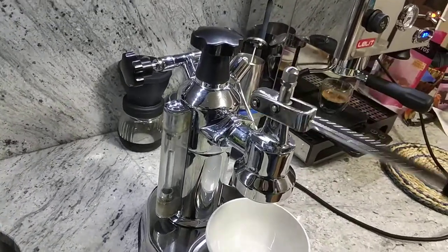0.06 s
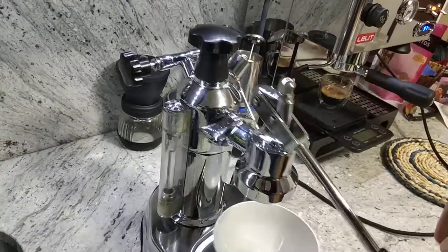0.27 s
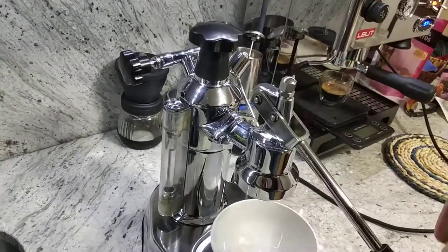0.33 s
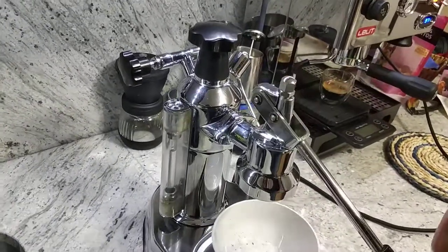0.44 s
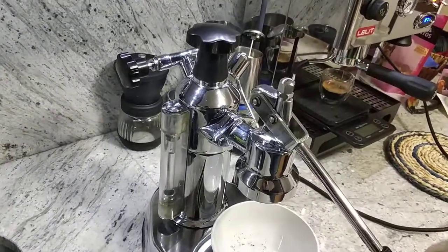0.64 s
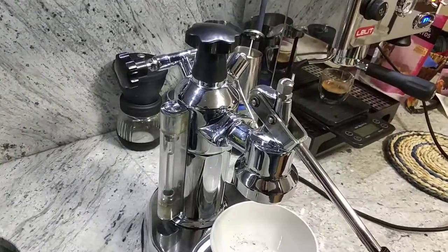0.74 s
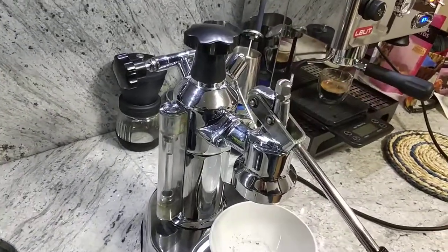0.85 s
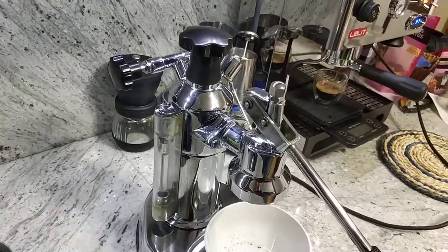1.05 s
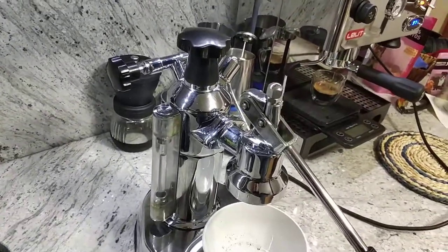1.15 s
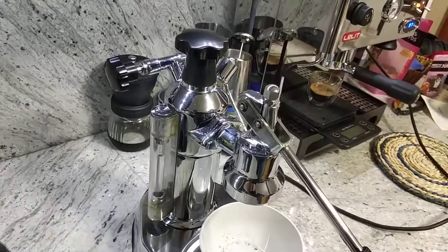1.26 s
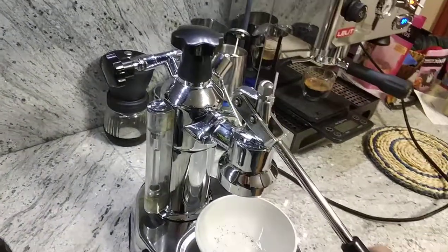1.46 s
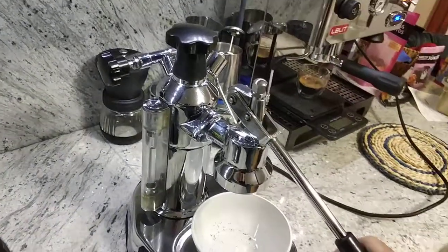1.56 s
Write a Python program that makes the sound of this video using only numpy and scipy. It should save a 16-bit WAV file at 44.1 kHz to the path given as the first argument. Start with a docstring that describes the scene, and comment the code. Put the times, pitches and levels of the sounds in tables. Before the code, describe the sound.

An espresso machine's steel lever clacks down, sharp and bright, at about 0.2 seconds, after a faint hiss of steam. A sputtering spurt follows at once while the machine rattles on the kitchen counter, knocking hardest near 0.4 seconds. Both die away by about 0.7 seconds, leaving a fading metallic ring. A thin hiss continues until around 1.6 seconds.

```python
"""A faint hiss of steam, then the steel lever of an espresso machine clacks down in a kitchen.
The impact excites short, bright modes of the steel. Escaping pressure drives a sputtering spurt
through the spout while the machine rattles on the counter; each knock feeds the modes of its
housing and body. These and one clear partial ring on, and the thin hiss remains."""
import sys
import numpy as np
from scipy import signal
from scipy.fft import rfft, irfft, next_fast_len
from scipy.io import wavfile
from scipy.ndimage import map_coordinates

SR = 44100
rng = np.random.default_rng(int(sys.argv[2]) if len(sys.argv) > 2 else 0)


def bounce(signal):
    """Save signal as a 16-bit WAV file at the path given by the first command-line argument."""
    frames = np.transpose(np.atleast_2d(signal))
    limited = np.clip(frames, -1, 1)
    pcm = np.round(limited * 32767).astype(np.int16)
    wavfile.write(sys.argv[1], SR, pcm)


N = 70560

# Spectra of the room's background and of the steam. Each row: frequency in Hz, relative level in dB.
BACKGROUND_COLOUR = [(30, -49.5), (100, -30), (200, -4), (300, 1.5), (420, -5), (800, -7.5), (1300, -19),
                     (3000, -20), (10000, -37)]
LEAK_COLOUR = [(760, -49), (1300, -14), (1680, -12), (1890, -7), (2370, -8.5), (2600, -6), (3240, -5),
               (3510, -5), (3850, -6), (4290, 1), (5860, -5.5), (7630, -1.5), (9670, -6.5), (10700, -21.5),
               (11500, -49), (15000, -77), (22000, -120)]
FIZZ_COLOUR = [(4000, -31), (6500, -8), (7700, 2), (9400, -1.5), (10700, -17)]
SPIT_COLOUR = [(2000, -35), (5000, -6), (6600, 8), (7800, 0), (10000, 1), (11000, -16.5)]
SPURT_COLOUR = [(1180, -31), (2000, -5.5), (2120, 1.5), (2380, -5), (3290, -2.5), (3570, -8.5), (4410, 1),
                (5740, -1), (7200, -2.5), (7920, -7.5), (8580, -4.5), (10700, -20.5), (11000, -32.5),
                (11300, -75), (11500, -91), (15000, -118), (22000, -120)]  # also colours the ticks of the rattle
SPURT_ROLL_OFF = [(100, -52.5), (400, -11.5), (2000, -1), (3500, -1.5)]
# Spectra of the solid contacts. Each row: frequency in Hz, relative level in dB.
CHATTER_COLOUR = [(35, -68), (60, -56), (141, -12.5), (211, -5), (249, 1.5), (335, -5), (533, -4),
                  (800, -8.5), (999, -1.5), (1140, -8), (1250, 1), (1560, -13), (1740, -5), (2020, -17.5),
                  (2870, -11), (3650, -21), (5000, -19.5), (6500, -43.5), (11000, -120)]
CLANG_COLOUR = [(100, -46), (300, -8), (700, -15.5), (1000, -1), (1400, -1), (1850, -1.5), (2150, -6.5),
                (2850, -8), (3500, -22), (8000, -37.5)]
THUD_COLOUR = [(50, -59.5), (110, -24), (145, -10.5), (215, 4.5), (270, -4.5), (370, -3), (470, -10),
               (1000, -33), (3000, -67.5)]
SCRAPE_COLOUR = [(120, -50.5), (280, -10), (400, 4.5), (850, 0), (1300, -13.5), (2200, -12.5),
                 (6000, -17.5), (10000, -26.5)]
CLACK_COLOUR = [(100, -59), (200, -32.5), (400, -12), (1350, -17), (1700, -24.5), (2300, -16), (3500, -17),
                (4100, -2), (5700, -6), (6200, -4), (8600, -6.5), (10500, -22.5), (11500, -41)]

# Drift of the background. Each row: time in seconds, level in dB.
BACKGROUND_LEVEL = [(0, -65.5), (.9, -66.5), (1.35, -60.5), (1.6, -64.5)]
# Reverberation of the kitchen. Each row: frequency in Hz, T60 in seconds.
KITCHEN_T60 = [(150, 0.71), (500, 0.47), (2000, 0.49), (5000, 0.51), (10000, 0.33)]
# Difference between the channels. Each row: frequency in Hz, gain of the side signal in dB.
SIDE_GAIN = [(3500, -82), (5200, -25.5), (7000, -17.5), (10000, -10), (11000, -11)]

# Course of the leak. Each row: time in seconds, hiss level in dB, high whistle level in dB.
LEAK_LEVELS = [(0, -53, -59), (0.041, -62.5, -73), (.075, -55, -51), (.1, -60.5, -65), (.15, -51.5, -56),
               (0.199, -46, -59), (.45, -62.5, -65.5), (0.779, -62.5, -68.5), (0.889, -63, -63),
               (1.079, -62.5, -73), (1.2, -55, -73), (1.35, -54, -67), (1.5, -57.5, -71), (1.6, -55.5, -72)]
# Resonances of leak and spout. Each row: centre in Hz, bandwidth in Hz, relative level in dB.
LEAK_RESONANCES = [(1956, 180, -12.5), (3480, 210, -17.5), (4200, 240, -11)]
SPOUT_RESONANCES = [(4795, 840, -9), (6375, 300, -8.5), (8880, 300, -11)]

# Modes of the machine's parts. Each row: frequency in Hz, relative level in dB, T60 in seconds.
HOUSING_MODES = [(842, -9, 0.14), (1021, -5, .4), (1101, -2, 0.41), (1412.3, 0, 0.14), (1400, -3, 0.51),
                 (1572, -9, 0.59), (1643, -5, .35), (1756, 3, 0.41), (1841, 5, 0.1), (2500, -12, .3),
                 (2890, -10.5, .27)]
BODY_MODES = [(151, -1.5, 0.22), (177, -5.5, .18), (212.13, 1, .36), (302.3, -9, 0.79), (332, -6, 0.63),
              (375, 0, 0.18)]
SMALL_PART_MODES = [(4398, -3, 0.29), (4510, -5.5, 0.18), (4750, 0, .25), (6240, -1.5, 0.25),
                    (6750, -4.5, 0.218), (8300, 2.5, 0.17)]
LONG_MODES = [(1241, -23, 1.105), (208.5, -36, 1.71)]
LEVER_MODES = [(2366, -19.5, .1), (4095, -4.5, .08), (4420, -4.5, 0.24), (4600, -2.5, 0.22),
               (4890, -2.5, 0.1), (6227, 12.5, 0.036), (6340, -2, .09), (6750, -5.5, 0.073),
               (6750, -19.5, .07), (7330, -4, .07), (8378, 0.5, 0.11), (8150, 3, 0.027)]

# Knocks of the rattle. Each row: start in seconds, then levels of clang, thud and tick in dB.
KNOCKS = [(.236, -23, -48.5, -34), (.252, -22.5, -44.5, -34.5), (0.281, -24, -42.5, -26),
          (0.312, -20.5, -31, -32.5), (0.3145, -14.5, -34, -32), (.345, -18.5, -33, -18.5),
          (.357, -19, -32.5, -24.5), (0.3638, -19, -19, -18.5), (0.38, -20.5, -23.5, -22),
          (.396, -10, -22, -22), (0.411, -27, -23.5, -44), (0.416, -23.5, -27.5, -21),
          (0.425, -20.5, -24.5, -37.5), (0.443, -28.5, -37, -36.5), (.473, -28.5, -43, -47),
          (0.504, -22.5, -35, -34), (0.5209, -24, -33, -48)]
# A late spit of steam, and the lever's contacts. Each row: start in seconds, level in dB.
SPITS = [(.689, -47.5)]
CLACKS = [(0.2303, -14.5), (0.2336, -3.5), (0.2418, -15), (0.2596, -21)]

# Overall passband. Each row: frequency in Hz, gain in dB.
PASSBAND = [(40, -20), (95, -15.5), (140, -3), (10000, -4.5), (10650, -6.5), (11400, -34)]


def amp(db):
    """Decibels to amplitude ratio."""
    return 10 ** (np.asarray(db) / 20)


def unit(x):
    """Normalisation to rms 1."""
    return x / np.sqrt(np.mean(x ** 2) + 1e-20)


def along(points, hz):
    """Interpolation of (Hz, value) points on a logarithmic frequency axis."""
    f, v = np.transpose(points)
    return np.interp(np.log(hz + 1), np.log(f + 1), v)


def curve(rows):
    """Linear interpolation of (seconds, value) points at every sample."""
    return np.interp(np.arange(N) / SR, *np.transpose(rows))


def since(start):
    """Seconds elapsed since start, zero before."""
    return np.maximum(np.arange(N) / SR - start, 0)


def wobble(rate):
    """Smooth random modulation with rate knots a second."""
    return map_coordinates(rng.standard_normal(N // 20), [np.arange(N) * rate / SR], mode="wrap")


def filtered(x, response):
    """Linear filtering: the spectrum of x times a frequency response."""
    size = next_fast_len(N + SR // 2)
    return irfft(rfft(x, size) * response(np.fft.rfftfreq(size, 1 / SR)), size)[..., :N]


def high_pass(x, hz):
    """Fourth-order attenuation of the bass below hz."""
    return signal.sosfilt(signal.butter(4, hz, "highpass", fs=SR, output="sos"), x)


def coloured(x, colour):
    """Spectral shaping by (Hz, dB) points, at rms 1."""
    return unit(filtered(x, lambda hz: amp(along(colour, hz))))


def noise(colour):
    """Coloured Gaussian noise of rms 1."""
    return coloured(rng.standard_normal(N), colour)


def grains(rate, spread_db):
    """A Poisson process: impulses of random sign and strength, on average rate a second."""
    return (rng.random(N) < rate / SR) * rng.choice([-1, 1], N) * amp(spread_db * rng.standard_normal(N))


def blow(start, t60, attack_s):
    """Envelope of a damped response: a rise, then exponential decay."""
    t = since(start)
    return amp(-60 * t / t60) * (1 - np.exp(-t / attack_s))


def swell(start, end, rise_db_per_s, fall_db_per_s):
    """Envelope that grows exponentially until start, holds, and decays after end."""
    t = np.arange(N) / SR
    return amp(-rise_db_per_s * np.maximum(start - t, 0) - fall_db_per_s * since(end))


def whistle(hz, width_hz):
    """Resonance driven by noise: a narrow band that flutters in level."""
    band = filtered(rng.standard_normal(N), lambda f: 1 / (1 + (2 * (f - hz) / width_hz) ** 2))
    return amp(2.3 * wobble(24)) * unit(band)


def ring(start, modes, scatter_db, attack_s):
    """Free vibration: a sum of damped sinusoids of scattered strength and random phase."""
    t, out = since(start), np.zeros(N)
    for hz, db, t60 in modes:
        envelope = amp(db + scatter_db * rng.standard_normal()) * blow(start, t60, attack_s)
        out += envelope * np.sin(2 * np.pi * (hz * t + rng.random()))
    return out


def sustained(starts, levels_db, modes, waver_db=3):
    """Incoherent summation: the energies of many hits add in each mode; level and phase waver."""
    t, out = since(0), np.zeros(N)
    for hz, mode_db, t60 in modes:
        energy = sum((amp(db) * blow(start, t60, 0.002)) ** 2 for start, db in zip(starts, levels_db))
        cycles = hz * t + rng.random() + 0.05 * wobble(40)
        out += amp(mode_db + waver_db * wobble(30)) * np.sqrt(energy) * np.sin(2 * np.pi * cycles)
    return out


def background():
    """Ambient noise: a faint, low rush that drifts in level."""
    return amp(curve(BACKGROUND_LEVEL)) * noise(BACKGROUND_COLOUR)


def kitchen(x):
    """Reverberation: reflections from stone walls form a diffuse tail whose treble dies first."""
    hz, t, spectra = signal.stft(rng.standard_normal(SR), SR, nperseg=256)
    decay = amp(-60 * t / along(KITCHEN_T60, hz)[:, None])
    tail = signal.istft(spectra * decay, SR, nperseg=256)[1]
    response = np.pad(tail / np.linalg.norm(tail), (SR // 250, 0))  # arrives 4 ms late
    return signal.fftconvolve(x, response)[:N]


def leak():
    """Flow noise: steam hisses, whistles and spits once; a bright fizz joins as the leak opens."""
    times, hiss_db, whistle_db = np.transpose(LEAK_LEVELS)
    hiss = noise(LEAK_COLOUR) + sum(amp(db) * whistle(hz, width) for hz, width, db in LEAK_RESONANCES)
    hiss *= amp(curve(np.c_[times, hiss_db]) + 0.6 * wobble(35)) / np.std(hiss)
    high_whistle = amp(curve(np.c_[times, whistle_db])) * whistle(hz=6145, width_hz=170)
    fizz = amp(-60.5) * noise(FIZZ_COLOUR) * swell(1.26, 1.52, rise_db_per_s=61.5, fall_db_per_s=22)
    spit_envelope = sum(amp(db) * blow(start, t60=0.084, attack_s=0.002) for start, db in SPITS)
    return hiss + high_whistle + fizz + noise(SPIT_COLOUR) * spit_envelope


def ringing():
    """Modal decay: the knocks set the machine ringing; two lightly damped partials last longest."""
    starts, clang_db, thud_db, tick_db = np.transpose(KNOCKS)
    partials = ring(0.396, LONG_MODES, scatter_db=0.38, attack_s=0.09)  # from the hardest knock
    housing = amp(-18) * sustained(starts, clang_db, HOUSING_MODES)
    body = amp(-9.5) * sustained(starts, thud_db, BODY_MODES)
    jingle = amp(-22.5) * sustained(starts, tick_db, SMALL_PART_MODES)
    return partials + housing + body + jingle


def chatter():
    """Superposition of small impacts: they fill the gaps between the knocks and die away."""
    contacts = coloured(grains(rate=1500, spread_db=4.5), CHATTER_COLOUR)
    onset = 1 - np.exp(-since(0.22) / 0.025)
    return amp(-28) * contacts * swell(0.36, 0.46, rise_db_per_s=110, fall_db_per_s=103.5) * onset


def rattle():
    """Impact noise: each knock on the counter gives a mid-range clang, a low thud and a high tick."""
    clang, thud, tick = noise(CLANG_COLOUR), noise(THUD_COLOUR), noise(SPURT_COLOUR)
    out = np.zeros(N)
    for start, clang_db, thud_db, tick_db in KNOCKS:
        out += amp(clang_db) * clang * blow(start, t60=0.043, attack_s=0.0005)
        out += amp(thud_db) * thud * blow(start, t60=0.07, attack_s=0.0056)
        out += amp(tick_db) * tick * blow(start, t60=0.039, attack_s=0.0006)
    return out


def spurt():
    """Jet noise: steam and droplets excite the spout's resonances and fade as the pressure drops."""
    droplets = unit(grains(rate=2000, spread_db=2.5))
    steam = 1.2 * rng.standard_normal(N)
    spray = coloured(coloured(droplets + steam, SPURT_COLOUR), SPURT_ROLL_OFF)
    spout = sum(amp(db) * whistle(hz, width) for hz, width, db in SPOUT_RESONANCES)
    sputter = amp(-27 + 0.89 * wobble(130))
    return sputter * unit(spray + spout) * swell(0.2314, 0.375, rise_db_per_s=901, fall_db_per_s=132)


def lever():
    """Friction, then impact: the linkage drags, and steel bounces on steel with a crack and a ring."""
    crack_noise, clacks = noise(CLACK_COLOUR), np.zeros(N)
    scrape = amp(-35) * noise(SCRAPE_COLOUR) * blow(0.208, t60=0.48, attack_s=0.015)
    for start, db in CLACKS:
        crack = crack_noise * blow(start, t60=0.027, attack_s=0.00029)
        steel = amp(-18) * ring(start, LEVER_MODES, scatter_db=1.5, attack_s=0.00015)
        clacks += amp(db) * (crack + steel)
    return scrape + clacks


def scene():
    """Direct and reverberant sound add; above about 5 kHz the treble differs slightly between the two channels."""
    direct = high_pass(lever(), hz=258) + high_pass(rattle() + chatter(), hz=107) + spurt()
    mid = direct + amp(-7) * kitchen(direct) + ringing() + leak() + background()
    side = filtered(kitchen(mid), lambda hz: amp(along(SIDE_GAIN, hz)))
    return np.array([mid + side, mid - side])


def record(dry):
    """Band limiting: the deep bass is weakened and the top of the treble is cut off."""
    return filtered(dry, lambda hz: (hz < 11400) * amp(along(PASSBAND, hz)))


dry = scene()
out = record(dry)
bounce(out)
```